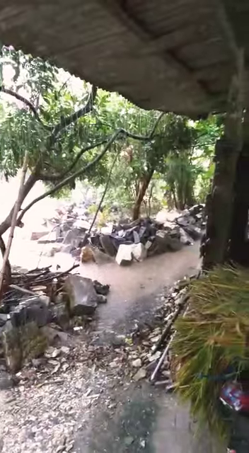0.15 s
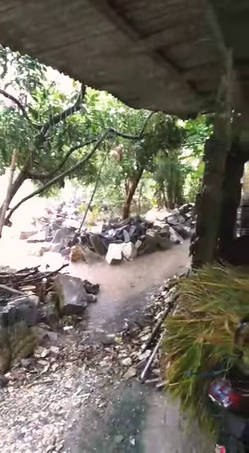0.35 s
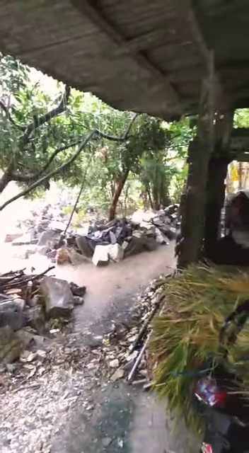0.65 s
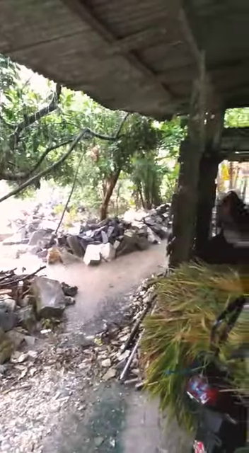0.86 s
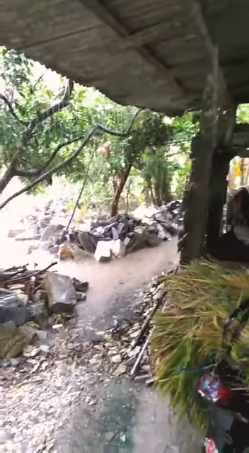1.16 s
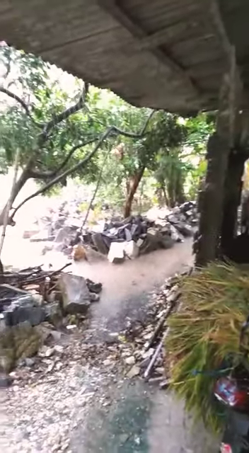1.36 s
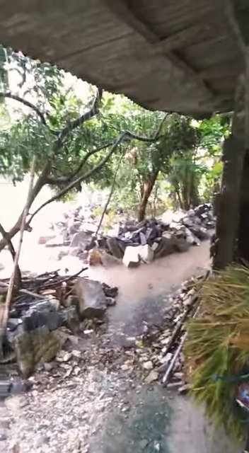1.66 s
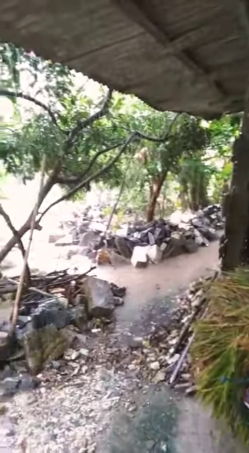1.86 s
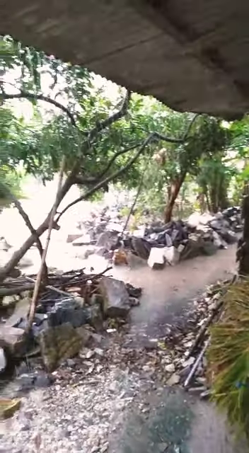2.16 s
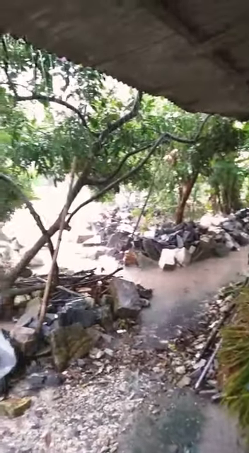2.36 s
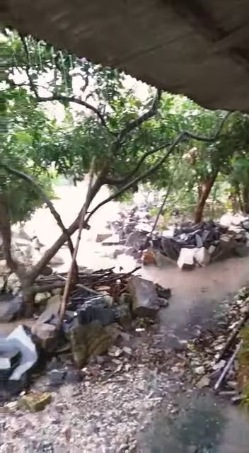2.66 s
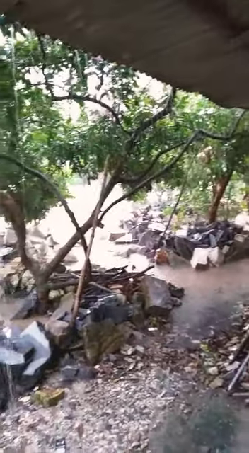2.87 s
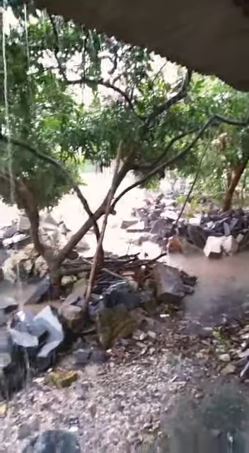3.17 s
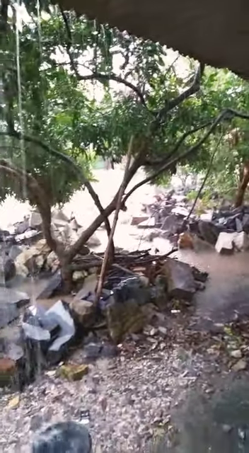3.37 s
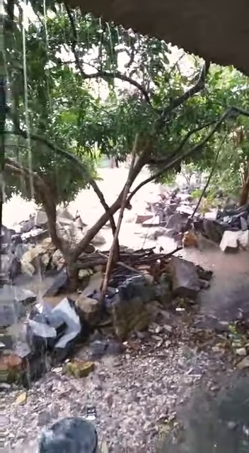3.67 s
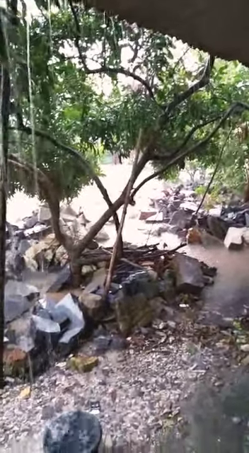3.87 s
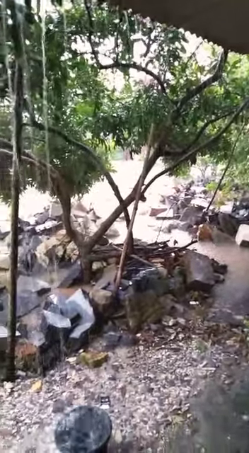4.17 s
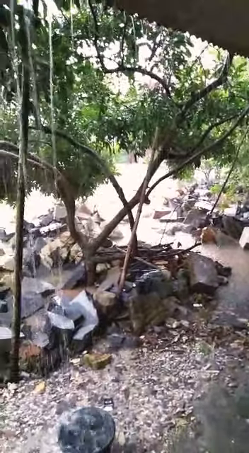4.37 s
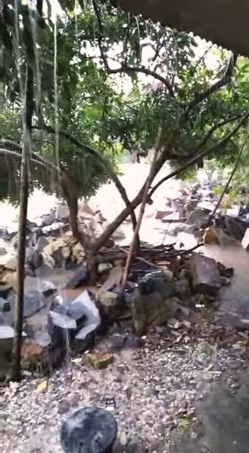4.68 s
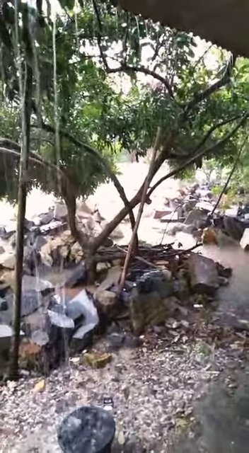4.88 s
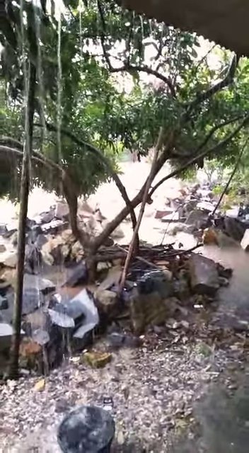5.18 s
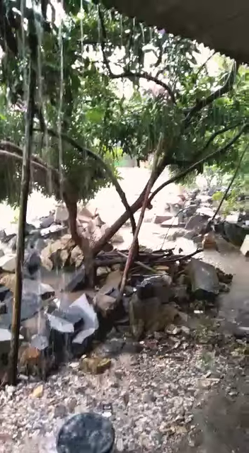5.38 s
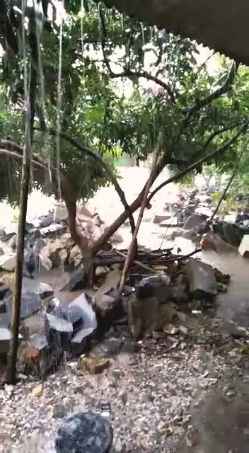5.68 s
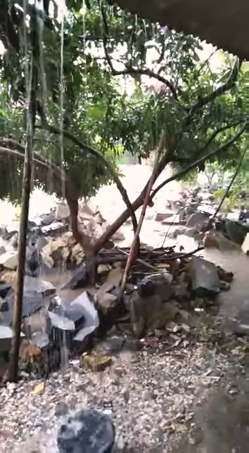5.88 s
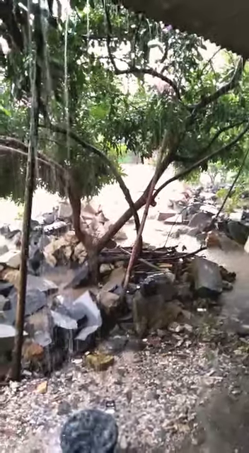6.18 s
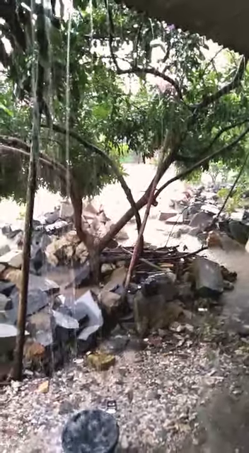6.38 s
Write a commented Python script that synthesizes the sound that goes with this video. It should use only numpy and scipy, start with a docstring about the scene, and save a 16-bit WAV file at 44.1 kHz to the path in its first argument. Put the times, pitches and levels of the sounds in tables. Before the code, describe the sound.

Rain hisses over trees and gravel while close drops tick, slap and plink near a sheltered listener, above a faint low wavering rumble.

```python
"""Heavy rain on a yard and its trees, heard from under a sheet roof, over a low rumble with a wavering drone.
From the start, drops tap and ring on the roof, big drops slap on stones and gravel, and bubbles plink in
the puddles; filtered noise and crowds of tiny tones make the wash, and decaying tones make each near hit.
The drone swells at 1.3 s. From about 5.8 s the crackle of water off the eaves comes in surges, while the
strongest ring in the hiss sinks and partly returns."""
import sys
import numpy as np
from scipy import signal
from scipy.fft import rfft, irfft, next_fast_len
from scipy.io import wavfile

SR = 44100
rng = np.random.default_rng(int(sys.argv[2]) if len(sys.argv) > 2 else 0)


def dump(signal):
    """Clip the signal to [-1, 1] and save it as 16-bit WAV at the path in sys.argv[1]."""
    limited = np.clip(np.atleast_2d(signal).T, -1, 1)
    pcm = np.round(limited * 32767).astype(np.int16)
    wavfile.write(sys.argv[1], SR, pcm)


N = 287912
TIME = np.arange(N) / SR
AGE = TIME[:SR // 3]   # time axis of one hit, in s
SLAP_TOP_HZ, SPLASH_TOP_HZ = 4400, 7000   # upper edges of the wash and of the hiss
# time from the start of the sound to its centre, for a soft onset
SPLASH_CENTRE_S, BUBBLE_CENTRE_S = 0.0062, 0.012


def from_db(db):
    """Level to amplitude: 20 dB are a factor of ten."""
    return 10 ** (np.asarray(db) / 20)


def rms_one(x):
    """Normalizes the effective value to 1."""
    return x / np.sqrt(np.mean(x ** 2) + 1e-20)


def onset_one(x):
    """Normalizes the effective value of the first 25 ms to 1."""
    onset = x[..., :SR // 40]
    return x / np.sqrt(np.mean(onset ** 2, axis=-1, keepdims=True) + 1e-20)


def peak_one(x):
    """Normalizes the peak to 1."""
    return x / np.abs(x).max()


def in_time(rows):
    """Linear interpolation of each column over time, the first column being t/s."""
    s, *columns = np.transpose(rows)
    return [np.interp(TIME, s, column) for column in columns]


def add(track, s, sound):
    """Superposition: mixes a sound in at time s, cut at the end of the track."""
    start = max(round(s * SR), 0)
    track[start:start + len(sound)] += sound[:len(track) - start]


def band(x, hz, kind, order=4):
    """Butterworth filter, flat in its passband."""
    return signal.sosfilt(signal.butter(order, hz, kind, fs=SR, output="sos"), x)


def drift(rate_hz):
    """Slow random variation of rms 1: noise through a critically damped two-pole lowpass."""
    step = 40   # samples per slow value
    pole = np.exp(-2 * np.pi * rate_hz * step / SR)
    noise = rng.standard_normal(N // step + 2002)
    slow = signal.lfilter([1], [1, -2 * pole, pole * pole], noise)[2000:]   # settled part
    return np.interp(np.arange(N) / step, np.arange(len(slow)), rms_one(slow))


def tint(x, spectrum):
    """Spectral weighting: a gain curve, linear in dB over log frequency."""
    hz, db = np.transpose(spectrum)
    size = next_fast_len(len(x))
    grid = np.maximum(np.arange(size // 2 + 1) * SR / size, 1)
    gain_db = np.interp(np.log(grid), np.log(hz), db)
    return irfft(rfft(x, size) * from_db(gain_db), size)[:len(x)]


def resonate(x, share):
    """Resonance: narrow bands of the spectrum are lifted by a share of their full boost in dB."""
    # resonances of the rain's hiss: [f/Hz, half width/Hz, full boost/dB]
    resonances = [(2905, 630, 34), (2990, 200, 1.5), (3230, 520, 8), (4190, 53, 9), (5295, 254, 31.5),
                  (5620, 124, 14.5), (5888, 124, 24.5), (6090, 64, 15.5), (9768, 950, 31)]
    size = next_fast_len(x.shape[-1])
    grid = np.arange(size // 2 + 1) * SR / size
    lift_db = sum(boost_db * np.exp(-((grid - hz) / width_hz) ** 2) for hz, width_hz, boost_db in resonances)
    return irfft(rfft(x, size) * from_db(share * lift_db), size)[..., :x.shape[-1]]


def watery(x, share):
    """The spectral envelope of falling water with a share of the resonances; rms 1."""
    # broad colour of falling water: [f/Hz, relative level/dB]
    water_colour = [(200, 3), (350, -1), (750, 2.5), (1500, 0.5), (2200, -1.5), (3500, -8.5), (4600, -10.5),
                    (6300, -5), (7500, 4.5), (8600, -5.5), (10300, -9), (11000, 4)]
    return rms_one(resonate(tint(band(x, 162, "high", order=2), water_colour), share))


def shelter(x, wet_db, echo_db, t60_s=0.23):
    """Reverberation: direct sound, one echo after 3 ms and a diffuse tail, drawn anew at each call."""
    build_up = 1 - np.exp(-(AGE / 0.0026) ** 2)
    response = rng.standard_normal(len(AGE)) * from_db(-60 * AGE / t60_s) * build_up
    tail = signal.fftconvolve(x, response)[:len(x)]
    time = TIME[:len(x)]
    echo = np.interp(time - 0.003, time, x, left=0)
    return x + from_db(echo_db) * echo + from_db(wet_db) * np.std(x) * rms_one(tail)


def droplet(hz, swell_s):
    """Damped oscillation: a tiny tone whose envelope peaks at twice swell_s and then dies."""
    age = AGE[:SR // 30]
    return (age / swell_s) ** 2 * np.exp(-age / swell_s) * np.sin(2 * np.pi * hz * age)


def patter(per_s, low_hz, high_hz, swell_s, spread_db, wet_db, count=4):
    """Random superposition: droplets of random time, pitch and size share a few reverberant spots."""
    spots = np.zeros((count, N))
    for k, (when, pitch, size) in enumerate(rng.random((int(per_s * N / SR), 3))):
        tone = droplet(low_hz + (high_hz - low_hz) * pitch, swell_s)
        add(spots[k % count], when * TIME[-1], from_db(-spread_db * size) * tone)
    return sum(shelter(spot, wet_db, echo_db=1.5, t60_s=0.24) for spot in spots)


def rumble(waver_db):
    """Common amplitude modulation: dull noise and a drone of slightly wandering pitch waver together."""
    # spectrum of the rumble: [f/Hz, relative level/dB]
    rumble_colour = [(20, -15), (38, -8.5), (60, -7), (95, 0), (130, -2.5), (165, -14), (220, -24.5),
                     (400, -38.5)]
    # levels before the waver: [t/s, rumble level/dB, drone level/dB]
    rumble_levels = [(0.0, -46.5, -49), (1.0, -48, -57), (1.3, -42, -37.5), (1.4, -47.5, -52.5),
                     (2.59, -50, -44), (2.69, -50, -64), (2.89, -56, -42), (3.19, -54.5, -64.5),
                     (3.79, -60, -73), (3.89, -59.5, -64), (4.29, -54, -49), (4.49, -58, -69),
                     (4.69, -55, -51), (6.08, -60, -60.5), (6.38, -54, -62), (6.53, -61, -69.5)]
    rumble_db, drone_db = in_time(rumble_levels)
    drone_hz = 83 + 1.01 * drift(1.87)
    drone = np.sin(2 * np.pi * np.cumsum(drone_hz) / SR)
    noise = rms_one(tint(rng.standard_normal(N), rumble_colour))
    return from_db(waver_db * drift(7.3)) * (from_db(rumble_db) * noise + from_db(drone_db) * drone)


def rain():
    """Incoherent superposition: rain on roof and leaves merges into a ringing hiss with ticks and droplets."""
    # the downpour before the band trims: [t/s, wash level/dB, hiss level/dB, fizz level/dB]
    downpour = [(0.0, -43.5, -49.5, -48.5), (0.73, -49.5, -42, -56), (1.02, -49.5, -47, -57.5),
                (1.42, -42.5, -45, -53.5), (1.78, -45, -49, -56), (2.03, -49, -45, -55.5),
                (3.2, -46.5, -49, -53.5), (3.71, -41.5, -47, -54), (3.96, -47.5, -45.5, -53),
                (4.31, -44.5, -47, -57), (4.51, -47.5, -54.5, -55.5), (5.11, -51, -53, -57),
                (5.53, -44.5, -48, -57), (6.13, -51, -47.5, -56.5), (6.27, -46.5, -41, -53.5),
                (6.53, -48.5, -53, -61.5)]
    # gain of the strongest ring in the hiss: [t/s, level/dB]
    ring_gain = [(0, 3), (2.5, 2), (3.8, -0.5), (5.1, 4), (5.7, -20), (6.53, -3)]
    wash_db, hiss_db, fizz_db = in_time(downpour)
    ring_db, = in_time(ring_gain)
    ring_hz, ring_width_hz = 5170, 250   # centre, half width

    merged = watery(rng.standard_normal(N), share=1.0)
    fine = patter(per_s=220, low_hz=2000, high_hz=10800, swell_s=.0007, spread_db=16, wet_db=2)
    tinkle = patter(per_s=800, low_hz=2000, high_hz=10800, swell_s=.003, spread_db=10, wet_db=7)
    water = from_db(-5.5) * merged + from_db(-7) * watery(fine, share=0.95) + watery(tinkle, share=0.98)
    ring = band(water, [ring_hz - ring_width_hz, ring_hz + ring_width_hz], "band", order=1)
    water = water + (from_db(ring_db) - 1) * ring

    # three registers, each following its own level
    wash = from_db(wash_db) * rms_one(band(water, [2100, SLAP_TOP_HZ], "band"))
    hiss = from_db(hiss_db) * rms_one(band(water, [SLAP_TOP_HZ, SPLASH_TOP_HZ], "band"))
    fizz = from_db(fizz_db) * rms_one(band(water, SPLASH_TOP_HZ, "high", order=6))
    far = rms_one(band(watery(rng.standard_normal(N), share=0), 2120, "low"))
    plops = rms_one(patter(per_s=16, low_hz=922, high_hz=2636, swell_s=0.0019, spread_db=3, wet_db=3.5))
    low = from_db(-56.5) * far + from_db(-64.0) * plops
    return low + from_db(-1.5) * wash + from_db(-1.67) * hiss + from_db(0.2) * fizz


def leaves():
    """Statistical merging: countless small drops on the leaves form a fine, even patter."""
    fine = patter(per_s=420, low_hz=4200, high_hz=9200, swell_s=.0012, spread_db=14, wet_db=6)
    return from_db(-63) * rms_one(fine)


def drips(swell_s, wet_db):
    """Pitch follows size: drips from one point of the eaves are alike, so they plink at nearly one pitch."""
    # drip points along the eaves: [f/Hz, level/dB]
    drip_points = [(750, -71.5), (982, -74), (1510, -69), (1765, -68), (2024, -66.5), (2448, -65),
                   (3134, -62), (3713, -71), (4229, -68), (4613, -83), (6854, -71), (7900, -67),
                   (8850, -66.5)]
    out = np.zeros(N)
    for hz, db in drip_points:
        point = patter(5, .985 * hz, 1.015 * hz, swell_s, spread_db=21.5, wet_db=wet_db, count=1)
        out += from_db(db) * rms_one(point)
    return out


def runoff(drop_db):
    """Jet break-up: a thread of water crackles densely on the stones, with larger droplets ringing out of it."""
    # flow off the eaves, steady until the first row and then in surges: [t/s, level/dB]
    flow = [(5.75, -52), (5.85, -47.5), (5.93, -39.5), (5.99, -57), (6.06, -50.5), (6.14, -39), (6.23, -50),
            (6.31, -43), (6.38, -46), (6.53, -48.5)]
    flow_db, = in_time(flow)
    crackle = patter(per_s=380, low_hz=3700, high_hz=6300, swell_s=.001, spread_db=12, wet_db=4)
    ringing = patter(per_s=170, low_hz=3700, high_hz=6200, swell_s=.0028, spread_db=9, wet_db=6)
    return from_db(flow_db) * rms_one(rms_one(crackle) + from_db(drop_db) * rms_one(ringing))


def roof_taps(swell_s, wet_db, t60_s, rebound_db):
    """Impact excitation: a drop sets one roof resonance ringing, and two rebounds land just after."""
    # the nearest drops on the roof: [t/s, onset level/dB, resonance f/Hz]
    taps = [(0.15, -51, 5600), (0.293, -45, 3050), (0.296, -54, 9870), (0.351, -46.0, 5330),
            (0.358, -54, 9740), (0.438, -48, 5280), (0.498, -46, 5260), (0.503, -42, 3090),
            (0.587, -38.5, 2810), (0.949, -47, 5420), (1.05, -45.0, 5300), (1.122, -42.0, 5390),
            (1.128, -47, 2960), (1.181, -39, 5300), (1.339, -43.5, 5360), (1.503, -45, 3080),
            (1.559, -53, 9900), (1.584, -49, 5620), (1.604, -43.0, 3050), (1.724, -51, 9670),
            (1.774, -43.5, 3170), (1.917, -44, 5460), (1.924, -42, 3040), (2.092, -45, 5440),
            (2.093, -48.5, 9720), (2.184, -47, 5400), (2.214, -45.5, 3040), (2.243, -45.5, 2890),
            (2.471, -49, 5520), (2.533, -43.5, 5460), (2.676, -49, 9770), (2.984, -49, 5560),
            (3.056, -41, 3000), (3.179, -40.5, 5390), (3.201, -41.5, 2970), (3.226, -41.5, 5450),
            (3.42, -48, 3010), (3.497, -40.5, 3020), (3.646, -42.5, 2970), (3.678, -51, 5360),
            (3.751, -53, 9640), (3.786, -52, 2970), (3.845, -44.5, 2865), (3.846, -47.5, 5780),
            (3.975, -45, 2900), (4.049, -48, 3044), (4.103, -58, 9620), (4.3, -46, 5380),
            (4.346, -44, 3050), (4.434, -50, 9430), (4.441, -48.5, 5370), (4.445, -44.5, 2990),
            (4.5, -46, 3100), (4.539, -47, 3010), (4.541, -49.5, 5570), (4.72, -47.5, 5670),
            (4.764, -43, 3070), (4.875, -40.0, 3010), (4.908, -44.5, 5320), (5.014, -45.5, 2925),
            (5.052, -51.5, 9770), (5.099, -52.5, 9660), (5.121, -45, 5400), (5.217, -52, 9500),
            (5.275, -46, 2920), (5.302, -51.5, 9530), (5.517, -46, 5730), (5.529, -51.0, 9610),
            (5.555, -47.5, 5460), (5.624, -47, 2990), (5.703, -43.5, 2820), (5.828, -46.5, 2880),
            (5.901, -45, 3030), (6.077, -49, 5480), (6.11, -41.5, 3060), (6.17, -43.5, 5700),
            (6.289, -40.5, 5820)]
    out = np.zeros(N)
    for s, db, hz in taps:
        tone = np.zeros(len(AGE))
        add(tone, 0, droplet(hz, swell_s))
        for delay_s, ratio in rng.uniform([.004, .97], [.035, 1.03], (2, 2)):
            add(tone, delay_s, from_db(rebound_db) * droplet(hz * ratio, swell_s))
        add(out, s, from_db(db) * onset_one(shelter(tone, wet_db, echo_db=-13, t60_s=t60_s)))
    return out


def bubble(hz, swell_s, rise, rough):
    """Bubble oscillation: a brief, shaken pulse whose pitch rises as the bubble nears the surface."""
    age = (AGE - BUBBLE_CENTRE_S) / swell_s
    shake = 1 + rough * rms_one(band(rng.standard_normal(len(AGE)), hz / 8, "low", order=2))
    envelope = shake / np.cosh(np.minimum(age, 50))
    pitch_hz = hz * (1 + rise * np.tanh(age))
    return envelope * np.sin(2 * np.pi * np.cumsum(pitch_hz) / SR)


def bubbles(swell_s, rise, rough, wet_db, companion_db):
    """Pitch follows size: each bubble has a weaker companion, close behind and of nearly its size."""
    # the nearest bubbles in the puddles: [t/s, onset level/dB, mid-pulse f/Hz]
    puddle_bubbles = [(0.028, -45, 1333), (0.221, -47, 1140), (0.599, -47.5, 538), (0.6, -51.5, 1693),
                      (0.739, -52.5, 805), (0.805, -52.5, 287), (0.808, -45.5, 793), (1.424, -44.5, 1780),
                      (1.841, -50, 763), (2.03, -53, 800), (2.3, -42, 1750), (2.305, -52.5, 990),
                      (2.351, -52.5, 1450), (2.643, -49.5, 992), (3.191, -56.5, 523), (3.627, -35, 749),
                      (3.931, -48.5, 753), (4.242, -43, 1534), (4.537, -50.5, 946), (4.562, -43, 1493),
                      (4.839, -47, 1473), (4.907, -35.5, 760), (4.909, -49.5, 312), (5.127, -50, 553),
                      (5.396, -44, 963), (5.494, -33, 1487), (5.505, -47.5, 1825), (5.51, -55.5, 510),
                      (5.53, -43.5, 1498), (5.683, -49.5, 1026), (5.718, -44.5, 983), (5.722, -50, 800),
                      (5.819, -46.5, 1487), (6.079, -46.5, 1535), (6.113, -45, 1517), (6.49, -52.5, 243)]
    out = np.zeros(N)
    for s, db, hz in puddle_bubbles:
        tone = bubble(hz, swell_s, rise, rough)
        delay_s, ratio = rng.uniform([.008, .96], [.035, 1.05])
        add(tone, delay_s, from_db(companion_db) * bubble(hz * ratio, swell_s, rise, rough))
        add(out, s - BUBBLE_CENTRE_S, from_db(db) * onset_one(shelter(tone, wet_db, echo_db=-14)))
    return out


def plinks(swell_s, wet_db, t60_s):
    """Bubble resonance: a small drop traps a tiny bubble, whose clear note reverberates under the roof."""
    # the nearest small drops in standing water: [t/s, onset level/dB, f/Hz]
    small_drops = [(0.013, -53, 7850), (0.031, -47, 4910), (0.053, -52, 8800), (0.106, -40, 3260),
                   (0.108, -44, 4870), (0.356, -55, 6800), (0.376, -52, 8000), (0.404, -51, 4200),
                   (0.437, -50.5, 2500), (0.626, -46.5, 2250), (0.765, -49, 7600), (0.779, -48, 4160),
                   (0.907, -39, 3135), (0.958, -48.5, 4200), (0.974, -48.5, 2495), (1.165, -46, 2330),
                   (1.265, -43.5, 4790), (1.27, -47.5, 2046), (1.288, -43, 4070), (1.3, -43, 4640),
                   (1.336, -51, 6850), (1.35, -46, 4160), (1.372, -52, 6630), (1.462, -47, 4200),
                   (1.463, -44.5, 4780), (1.557, -44.5, 4690), (1.66, -42.5, 2414), (1.757, -52, 8900),
                   (1.824, -54, 8960), (1.856, -40, 3100), (1.896, -48.5, 1990), (2.052, -41, 3147),
                   (2.246, -56, 6460), (2.621, -41, 3330), (2.624, -49, 4200), (2.69, -52, 4220),
                   (2.774, -45.5, 7700), (2.857, -46, 7920), (2.857, -47, 8340), (2.964, -50, 5580),
                   (3.064, -49, 5030), (3.384, -48, 2400), (3.455, -52, 4670), (3.505, -50, 4120),
                   (3.54, -39.5, 3110), (3.641, -47, 5090), (3.643, -54, 6800), (3.67, -45.5, 2475),
                   (3.682, -48, 4640), (3.686, -44.5, 3630), (3.843, -50, 2020), (3.844, -52, 4680),
                   (3.844, -49, 4430), (3.876, -48.5, 3490), (3.911, -42, 5380), (3.964, -43, 6180),
                   (3.964, -48.5, 7800), (4.09, -45, 6000), (4.102, -50.5, 3450), (4.175, -49, 3360),
                   (4.25, -55, 7840), (4.304, -52, 4160), (4.423, -50.5, 2010), (4.563, -54, 4170),
                   (4.676, -51, 8900), (4.685, -53, 7840), (4.782, -55, 6100), (4.808, -49, 8900),
                   (5.061, -54, 4270), (5.118, -46.5, 3570), (5.153, -56, 2460), (5.293, -54.5, 2020),
                   (5.315, -54, 6200), (5.334, -51.5, 8700), (5.334, -50, 4810), (5.447, -44, 2590),
                   (5.466, -50.5, 9100), (5.546, -41, 3030), (5.57, -43, 4230), (5.594, -48, 2410),
                   (5.664, -50, 4300), (5.818, -47, 4320), (5.835, -53, 2040), (5.85, -47, 3920),
                   (5.906, -50, 3350), (6.034, -50, 3580), (6.069, -52, 6890), (6.116, -44, 4140),
                   (6.193, -49, 3970), (6.281, -43.5, 3090), (6.308, -43, 4530), (6.368, -54, 8910),
                   (6.418, -52, 3600), (6.42, -44, 4270), (6.446, -47, 4390), (6.486, -49.5, 3440)]
    out = np.zeros(N)
    for s, db, hz in small_drops:
        tone = np.zeros(len(AGE))
        add(tone, 0, droplet(hz, swell_s))
        add(out, s, from_db(db) * onset_one(shelter(tone, wet_db, echo_db=-22, t60_s=t60_s)))
    return out


def ping(hz, ping_s, wet_db):
    """Impact transient: the short damped tone of a drop's first contact; peak 1."""
    tone = AGE ** 2 * np.exp(-AGE / ping_s) * np.sin(2 * np.pi * hz * AGE)
    return peak_one(shelter(tone, wet_db, echo_db=-14.0))


def shatter(swell_s, scatter_s, count):
    """Fragmentation: droplets of all pitches crowd around one moment, and those far from it are weaker."""
    out = np.zeros(len(AGE))
    for k, (late, pitch) in enumerate(rng.uniform([-.62, 0], 1, (count, 2))):
        tone = droplet(2000 + 8800 * (k + pitch) / count, swell_s)
        # the cube gathers the droplets at the centre
        add(out, SPLASH_CENTRE_S + scatter_s * late ** 3, from_db(-9 * abs(late)) * tone)
    return out


def slap(droplets, hz):
    """Spectral concentration: the largest droplets of a splash, weighted toward one pitch."""
    width_oct, floor_db = 0.27, -12   # spread around the pitch, weight far from it
    pitches = np.geomspace(1700, 5000, 16)
    near_db = np.maximum(-6 * (np.log2(pitches / hz) / width_oct) ** 2, floor_db)
    return onset_one(tint(band(droplets, [2000, 4800], "band"), np.c_[pitches, near_db]))


def big_drops():
    """Impact and break-up: a drop ticks on stone amid a slap, splash and fine spray, and the shelter rings on."""
    # the nearest big drops; the tick level is its peak, the others are onset levels:
    # [t/s, tick level/dB, tick f/Hz, slap level/dB, slap f/Hz, splash level/dB, spray level/dB]
    stone_drops = [(0.0246, -25, 2800, -40, 2950, -46, -54), (0.11, -24.5, 2730, -44, 2770, -44.5, -47),
                   (0.2172, -28, 3140.0, -44, 3200, -67, -67.0), (0.4065, -29, 5330, -47, 3720.0, -50, -59),
                   (0.5411, -20.5, 2950, -40, 2820, -64, -69.0), (0.6448, -22, 5450, -65, 2860.0, -37, -72),
                   (0.7151, -32, 5400, -63, 3380.0, -38.5, -64), (0.7374, -28.5, 6300, -38, 3440, -46, -51),
                   (0.7518, -26, 3300, -55, 3400.0, -42, -50), (0.8971, -30.5, 7870, -41.5, 3000, -58, -53),
                   (1.266, -25.5, 3100.0, -41.5, 3640, -46, -59),
                   (1.42, -23.5, 3000, -36, 3150, -59.0, -68.0),
                   (1.4338, -25, 3080, -54, 3310.0, -46, -68.0),
                   (1.4522, -22.5, 3170, -45, 3460.0, -54, -54), (1.4658, -31, 3300, -50, 3530, -41, -67),
                   (1.5597, -28.5, 4600, -52, 4460.0, -55, -62), (1.6605, -30, 9930, -42.5, 3400, -67, -57),
                   (1.6816, -18.5, 5280, -33.5, 3700, -42, -60), (1.7, -26, 3330, -44, 3600.0, -48, -69),
                   (1.747, -23, 3670, -40.5, 3850, -51, -68.0), (1.7592, -25, 5250, -57, 3600.0, -48, -54),
                   (1.8576, -23, 3060, -41, 2930, -63, -73), (1.9681, -31, 5470.0, -46, 3650, -42.5, -58),
                   (2.041, -29.5, 5430, -45, 3180, -46, -53), (2.2876, -33, 2940, -40, 2830.0, -51, -64),
                   (2.3227, -27.5, 5470, -42, 2730, -46, -50), (2.344, -23.5, 8350, -36.5, 2580, -42, -48),
                   (2.6235, -29, 3400, -43.5, 3620.0, -58, -63),
                   (2.7313, -32, 2950.0, -39.5, 3110.0, -46.0, -66.0),
                   (2.7637, -21.5, 2750, -38.5, 3470, -61, -71.0),
                   (2.777, -22.5, 5550, -41.5, 3540, -41, -52),
                   (2.8599, -25, 5880, -62, 3290.0, -50, -44.5),
                   (3.1427, -29.5, 2960, -39.5, 2880, -42.5, -60),
                   (3.4246, -27, 5930, -59, 3210.0, -54, -66), (3.7856, -31, 9400, -61, 3380.0, -52, -67),
                   (3.848, -31, 2900, -56, 3900, -53, -65), (3.9652, -24, 5900, -49.0, 3500, -45, -53.5),
                   (4.2422, -25, 2860, -35.5, 2800, -62, -48.5),
                   (4.5447, -35, 5740, -47, 3600.0, -59, -49.5),
                   (4.667, -33, 5840, -64.0, 4320.0, -44, -60), (4.849, -33, 3080, -41, 3070, -68, -68),
                   (4.9584, -28.5, 5560, -54, 3540.0, -50, -67), (4.9968, -25, 5460, -52, 2800, -42.5, -53),
                   (5.0633, -27, 5400, -63.0, 4210.0, -53, -54), (5.2821, -36, 2900, -49.5, 2500, -63, -50),
                   (5.418, -33, 3130, -39, 3430, -56, -72.0), (5.575, -27.5, 4250, -49, 4030, -47.5, -70),
                   (5.9122, -27, 5700, -54, 3860.0, -46, -55.5),
                   (6.4227, -30.5, 5650, -52, 3630.0, -55, -69.0)]
    out = np.zeros(N)
    for s, tick_db, tick_hz, slap_db, slap_hz, splash_db, spray_db in stone_drops:
        broken = shatter(swell_s=0.00064, scatter_s=0.027, count=28)
        droplets = resonate(shelter(broken, wet_db=4.5, echo_db=-3.5, t60_s=0.29), share=0.27)
        splash = onset_one(band(droplets, (5170, 6300), "band"))   # smaller droplets
        spray = onset_one(band(droplets, (6800, 10100), "band"))   # the finest
        add(out, s, from_db(tick_db) * ping(tick_hz, ping_s=0.00041, wet_db=-1.0))
        add(out, s - SPLASH_CENTRE_S, from_db(slap_db) * slap(droplets, slap_hz)
            + from_db(splash_db) * splash + from_db(spray_db) * spray)
    return out


def scene():
    """Superposition of all sources, from the rumble to the big drops, in one channel."""
    behind = rumble(waver_db=2.0) + rain() + leaves()
    eaves = drips(swell_s=0.0024, wet_db=2.5) + runoff(drop_db=1.5)
    roof = roof_taps(swell_s=0.0011, wet_db=3.0, t60_s=0.24, rebound_db=-7.5)
    puddles = bubbles(swell_s=0.0031, rise=0.011, rough=0.3, wet_db=-3.5, companion_db=-14.5)
    drops = plinks(swell_s=0.0022, wet_db=1, t60_s=0.27) + big_drops()
    return (behind + eaves + roof + puddles + drops)[None]


def record(dry):
    """Band limitation: a steep lowpass near 11 kHz leaves the top treble very faint."""
    edge_hz, cutoff_hz = 11150, 15800
    heard = signal.sosfilt(signal.cheby1(10, .5, edge_hz, fs=SR, output="sos"), dry)
    heard = heard + from_db(-15.0) * band(dry, edge_hz, "high")
    return signal.sosfilt(signal.ellip(10, .2, 80, cutoff_hz, fs=SR, output="sos"), heard)


dry = scene()
out = record(dry)
dump(out)
```